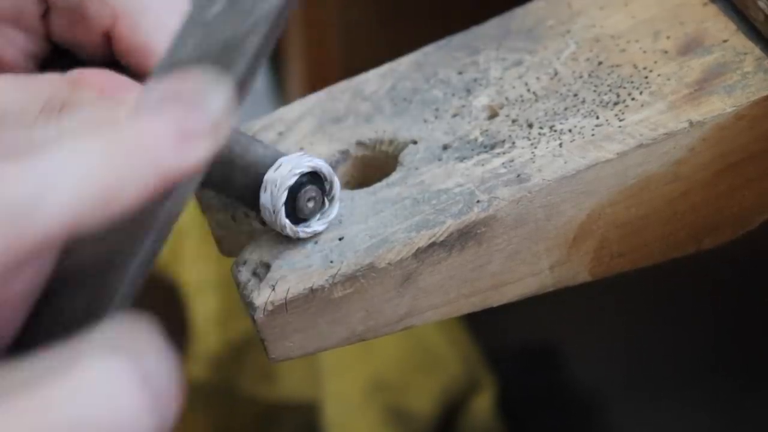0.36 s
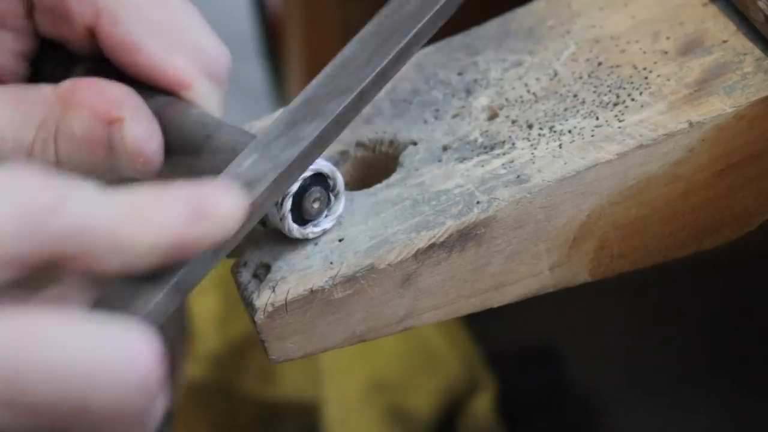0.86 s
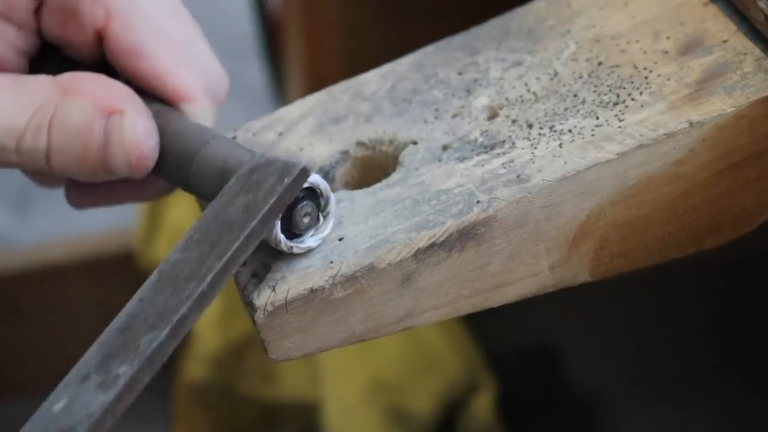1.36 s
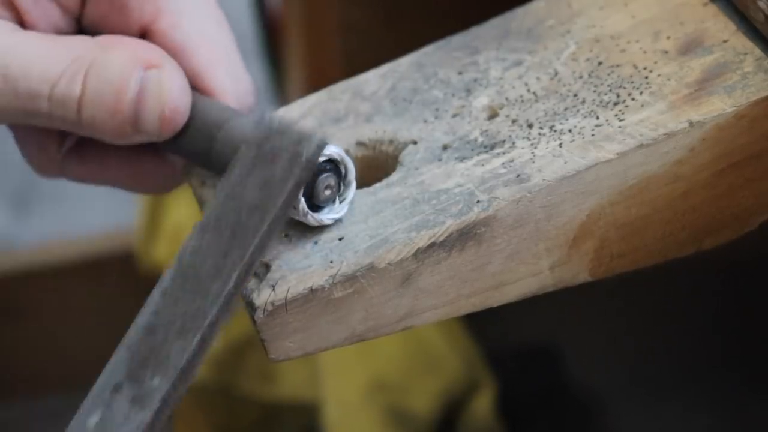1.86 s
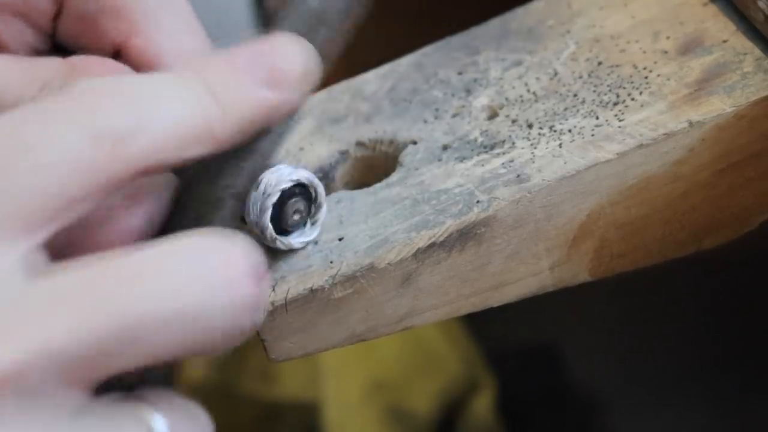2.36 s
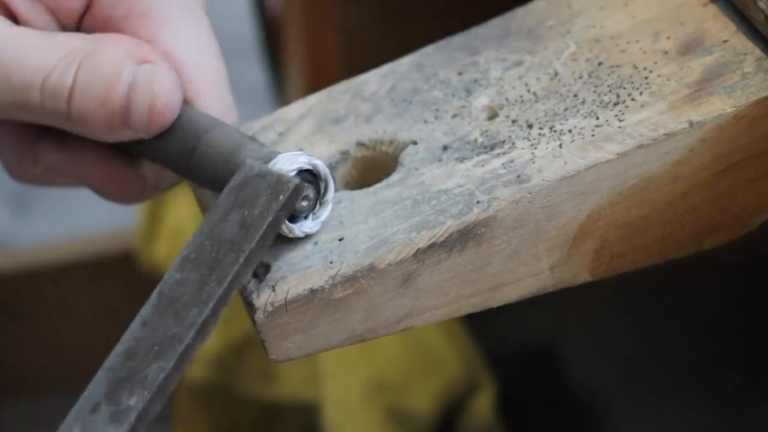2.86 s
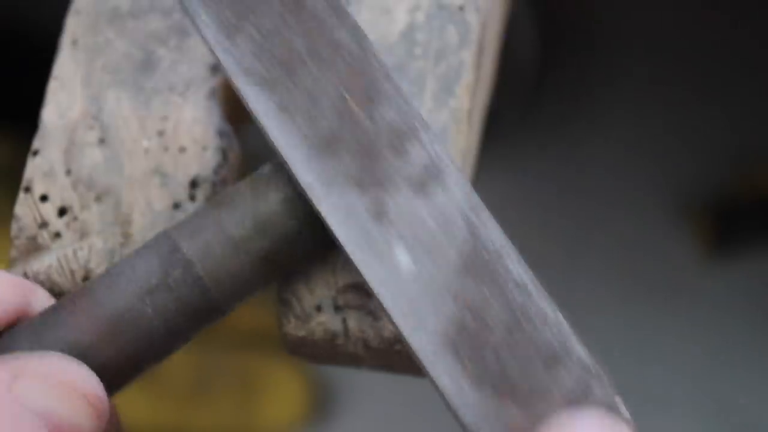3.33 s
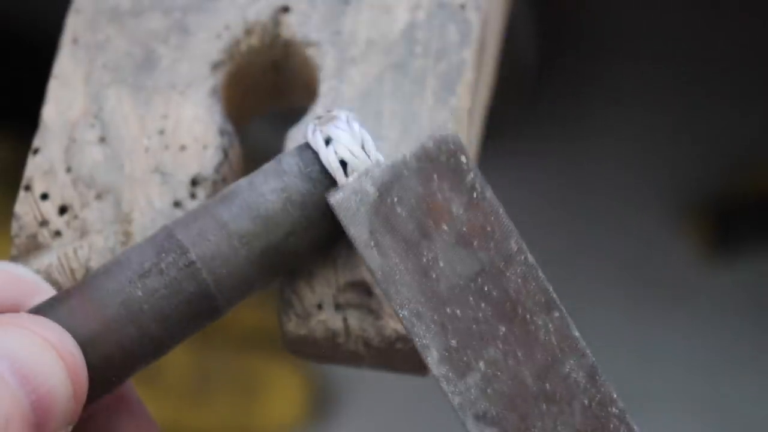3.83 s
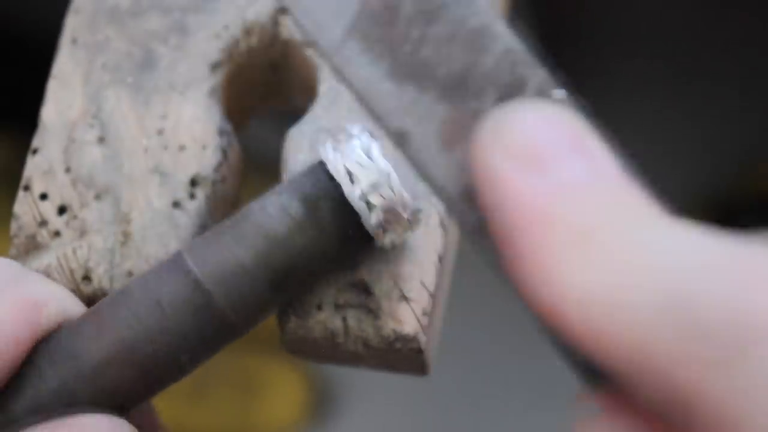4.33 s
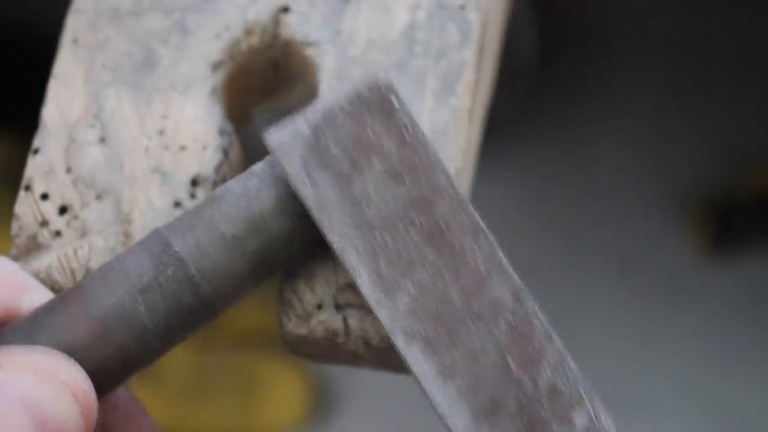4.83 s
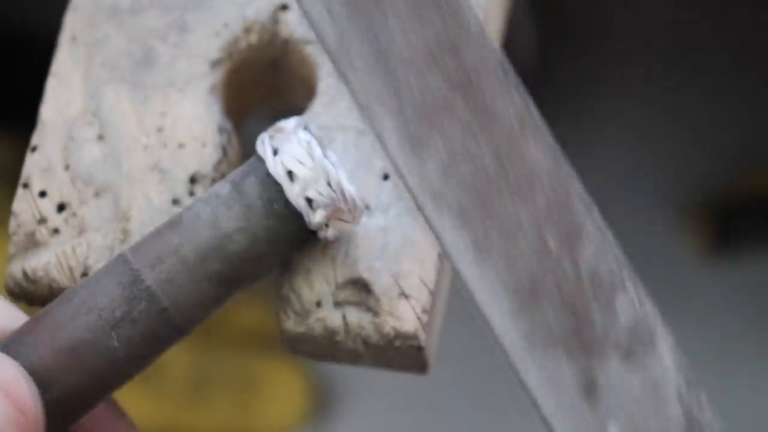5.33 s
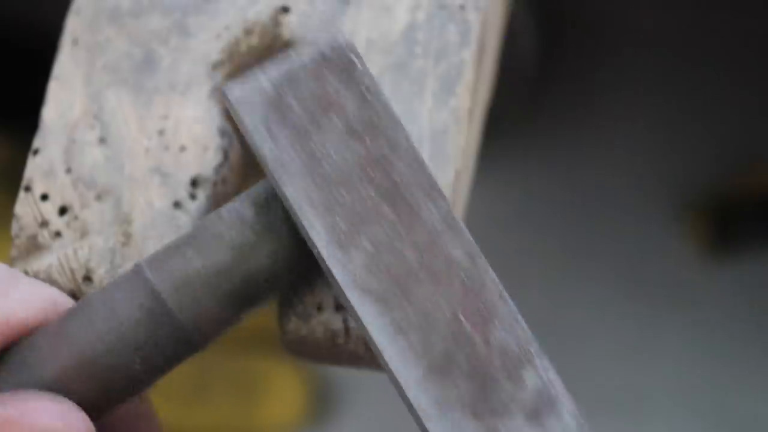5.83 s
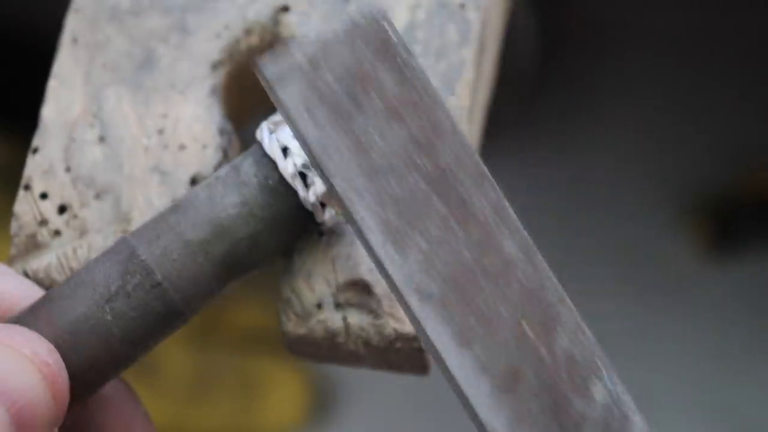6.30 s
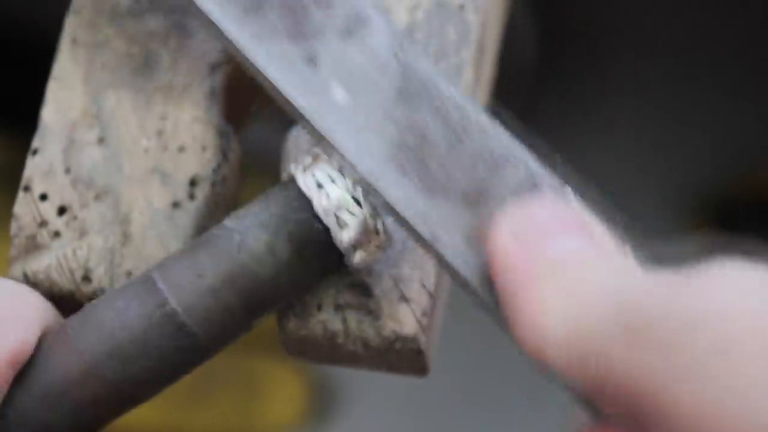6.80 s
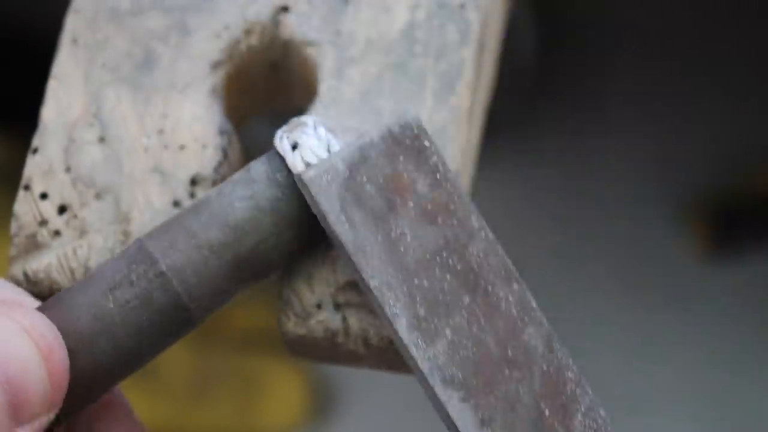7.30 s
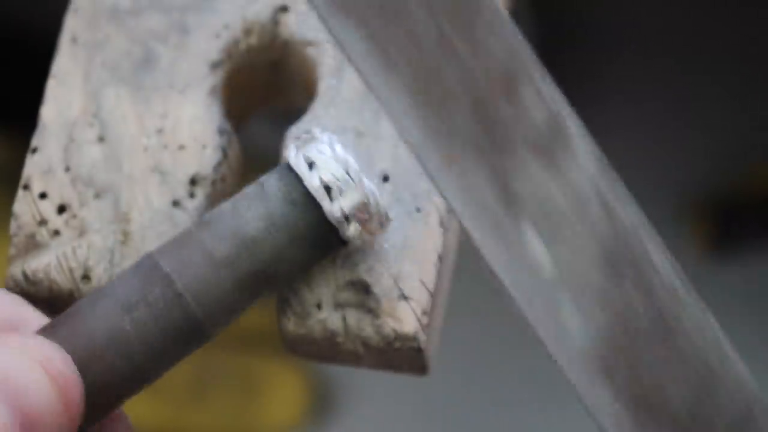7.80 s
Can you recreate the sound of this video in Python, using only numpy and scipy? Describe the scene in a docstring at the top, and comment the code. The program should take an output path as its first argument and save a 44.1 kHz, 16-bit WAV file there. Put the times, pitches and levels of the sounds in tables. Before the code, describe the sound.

Close stereo sound of a steel file working a metal ring held on a mandrel against a wooden bench, in a small, slightly live workshop with soft, steady air. Each stroke begins with a short hard knock, then a rough, gritty rasp with an uneven buzzing pitch lasting about 0.3 seconds, and leaves a brief metallic ring. Strokes start at about 0.0, 0.7, 1.4, 2.1 and 2.8 seconds, the fifth softer at first. At 3.1 the perspective cuts abruptly, and a stroke starts at once with several sharp catches and a bright skid near 3.4. More follow at about 3.9, 4.8, 5.8, 6.5 and 7.3, with wider gaps. A faint tick comes at 4.6, another gritty skid at 6.0, and barely audible light brushes around 4.6, 5.3 and 7.1. The last rasp ends near 7.7, leaving quiet air.

```python
"""In a small workshop a steel file lands on a metal ring on a mandrel and rasps across it on a wooden bench pin.
Unevenly spaced teeth and grit drive the rings of file, mandrel and bench; landings and catches are short knocks.
Bright skids cut into two strokes; small ticks and light brushes come between, over soft steady room air.
After the fifth stroke the sound is cut to a second, differently placed view, with a ring of its own."""
import sys
import numpy as np
from scipy import signal
from scipy.fft import rfft
from scipy.io import wavfile
from scipy.ndimage import uniform_filter1d

SR = 44100
rng = np.random.default_rng(int(sys.argv[2]) if len(sys.argv) > 2 else 0)


def waveform_to_disk(signal):
    """Save audio, clipped to [-1, 1], as 16-bit WAV at the path in sys.argv[1]."""
    frames = np.transpose(np.atleast_2d(signal))
    scaled = np.clip(frames, -1, 1) * 32767
    samples = np.round(scaled).astype(np.int16)
    wavfile.write(sys.argv[1], SR, samples)


def amplitude_ratio(level_db):
    """Convert a level in decibels to the matching linear amplitude (field) ratio."""
    exponent = np.asarray(level_db, float) / 20
    return 10 ** exponent


N = 349272
CUT_S = 3.107  # the second view starts here


def evened(x):
    """Scales a sound to an rms of one."""
    return x / np.sqrt(np.mean(x ** 2) + 1e-20)


def read(points, hz):
    """Reads a table of (frequency, value) along a logarithmic frequency axis."""
    f, value = np.transpose(points)
    return np.interp(np.log(hz + 1), np.log(f + 1), value)


def causal(gain_db):
    """Minimum-phase impulse response for a gain given from 0 Hz to half the sample rate."""
    mirrored_db = np.r_[gain_db, gain_db[-2:0:-1]]
    log_gain = np.log(amplitude_ratio(np.maximum(mirrored_db, -100)))
    spectrum = np.exp(np.conj(signal.hilbert(log_gain)))
    return np.fft.ifft(spectrum).real[:len(gain_db) - 1]


def pair(same, shape):
    """Two complex noise fields, left and right, alike by the share same."""
    a, b, c, d = rng.standard_normal((shape[1], shape[0], 4)).T
    same = np.clip(same, -1, 1)[:, None]
    left, other = a + 1j * b, c + 1j * d
    return np.array([left, same * left + np.sqrt(1 - same ** 2) * other])


def band(x, lo_hz, hi_hz):
    """One band of a sound, at an rms of one."""
    return evened(signal.sosfilt(signal.butter(2, [lo_hz, hi_hz], "bandpass", fs=SR, output="sos"), x))


def resonate(x, hz, width_hz):
    """Shifts the curve hz down to zero, smooths, and shifts back: a moving resonance, at an rms of one."""
    turn = np.exp(2j * np.pi * np.cumsum(hz * np.ones(len(x))) / SR)
    r = np.exp(-np.pi * width_hz / SR)
    return evened((turn * signal.lfilter([1 - r], [1, -r], x / turn)).real)


def add(mix, s, sound):
    """Lays a sound into the mix at s seconds."""
    part = mix[round(s * SR):][:len(sound)]
    part += sound[:len(part)]


def view_at(s):
    """Which view hears the time s: 0 before the cut, 1 after."""
    return int(s > CUT_S)


def stroke(rows, grip, ring):
    """Unevenly spaced teeth and loose grit knock the parts; the hand judders the pressure."""
    # change of the grip along every stroke:
    # (travel [0-1], bench thrum [dB], steel ring [dB], grit [dB], bright bite [dB])
    travel = [(0, 19.5, 2, -4.5, -12), (.2, 0.5, -14, -1.5, -7.5), (.45, 0, -5.5, -0.5, 2),
              (.75, 0, 0.5, 2.5, 2.5), (1, -21, 1, -8.5, -9.5)]
    jitter, uneven_db, judder_db = .25, 4.0, 2.6  # tooth spacing [share], tooth bites [dB], hand [dB]
    s, *columns = np.transpose(rows)
    t = np.arange(s[0], s[-1], 1 / SR)
    press_db, hz = (np.interp(t, s, c) for c in columns)
    along, *changes = np.transpose(travel)
    progress = np.linspace(0, 1, len(t))
    bench_db, steel_db, grit_db, bite_db = (
        db + np.interp(progress, along, c) for db, c in zip(grip, changes))
    octaves = np.log2(hz / 800)  # a faster file rings brighter
    wobble, judder, noise = rng.standard_normal((len(t), 3)).T

    tooth_hz = hz * np.maximum(1 + jitter * evened(uniform_filter1d(wobble, 40)), .1)
    teeth = np.cumsum(tooth_hz) / SR
    bite_size = amplitude_ratio(uneven_db * np.minimum(rng.exponential(1, len(t)), 2))
    bites = np.diff(np.floor(teeth), prepend=0) * bite_size
    push = bites - uniform_filter1d(bites, 200)
    hand = amplitude_ratio(judder_db * evened(uniform_filter1d(judder, 300)))
    drive = (evened(push) + .8 * noise) * hand  # teeth and grit
    rung = signal.fftconvolve(drive, ring)[:len(t)]

    # the tooth rate stands out as a rough tone
    whirr = band(rung, 310, 1790) + 1.1 * resonate(rung, hz, 230)
    sound = evened(whirr) + amplitude_ratio(bench_db) * band(rung, 56, 205)
    # slopes in dB per octave of tooth rate: steel 5, bite 7.5, grit 2.5
    sound += amplitude_ratio(steel_db + 5 * octaves) * band(rung, 1075, 2290)
    sound -= amplitude_ratio(bite_db + 7.5 * octaves) * band(rung, 2686, 5130)
    sound -= amplitude_ratio(grit_db + 2.5 * octaves) * band(rung, 5150, 18000)
    return s[0], amplitude_ratio(press_db) * sound * signal.windows.tukey(len(t), .08)


def knock(ring, db, tilt_db, mode_hz, contact_s, ring_s, thump_db=-40):
    """A short chattering contact rings the parts, damped by the hands; the bench adds a low thump."""
    t = np.arange(4000) / SR
    chatter = rng.standard_normal(len(t)) * np.exp(-(t / contact_s) ** 2)
    hz = np.fft.rfftfreq(1024, 1 / SR)
    favoured_db = 4 / (1 + ((hz - mode_hz) / 300) ** 2)
    light_db = -9 / (1 + (hz / 350) ** 4)  # a light tap barely moves the bench
    bright_db = tilt_db * np.log2((np.minimum(hz, 6500) + 200) / 1500)
    chatter = signal.fftconvolve(chatter, causal(bright_db + favoured_db + light_db))[:len(t)]
    hit = signal.fftconvolve(chatter, ring[:len(t)] * np.exp(-t / ring_s))[:len(t)]
    thump = np.sin(2 * np.pi * 142 * t) * (1 - np.exp(-t / 0.0015)) * np.exp(-t / 0.011)
    return amplitude_ratio(db) * (hit / abs(hit).max() + amplitude_ratio(thump_db) * thump)


def skid(db):
    """A short spray of grit, high and dry, as the file skids off a tooth."""
    t = np.arange(1500) / SR
    spray = band(rng.standard_normal(len(t)), 3600, 5630)
    return amplitude_ratio(db) * spray * np.minimum(t / 0.00078, 1) * np.exp(-t / 0.012)


def brush(start, length, squeak_db, rub_db):
    """A light touch swells and fades, sounding one high mode of the file and a low one of the mandrel."""
    noise = rng.standard_normal(round(length * SR))
    squeak = amplitude_ratio(squeak_db) * resonate(resonate(noise, 3355, 60), 3040, 200)
    rub = amplitude_ratio(rub_db) * resonate(resonate(noise, 474, 90), 400, 150)
    return start, (squeak + rub) * signal.windows.tukey(len(noise), .7)


def body(broad, modes):
    """The ring of the struck parts: peaks of the modes raised on the broad colour."""
    # treble of the struck parts: (frequency [Hz], relative level [dB])
    treble = [(2650, -29), (4500, -8.5), (5410, -8.5), (5880, -7), (6600, -2), (7850, -11.5),
              (10300, -22.5), (14300, -19), (15000, -17), (15800, -25)]
    hz = np.fft.rfftfreq(8192, 1 / SR)
    peaks = sum((amplitude_ratio(2 * db) - 1) / (1 + (2 * (hz - f) / width) ** 2) for f, width, db in modes)
    colour = np.hypot(amplitude_ratio(read(broad, hz)), amplitude_ratio(read(treble, hz) - 20))
    return causal(20 * np.log10(colour) + 10 * np.log10(np.maximum(1 + peaks, .01)))


def view_rings():
    """File, mandrel and bench pin ring together, coloured by where each view hears them from."""
    # modes of file, mandrel and bench pin from each view: (frequency [Hz], width [Hz], rise [dB])
    modes_first = [(141, 17, 10.5), (273, 100, 13.5), (464, 130, 6), (693, 10, 3), (880, 72, 3),
                   (1080, 38, 11), (1350, 51, 7.5), (1730, 58, 5.5), (1990, 150, 7), (2318, 29, 8.5),
                   (3280, 750, 3.5), (3464, 100, 5), (5100, 110, 13), (5700, 85, 6.5)]
    modes_second = [(149, 32, 10), (259, 35, 19), (401, 92, 4.45), (561, 48, 8.4), (706, 19, 9.4),
                    (850, 8, 9), (985, 55, 7.5), (1070, 194, 9.1), (1680, 110, 5.1), (1750, 78, 1.7),
                    (2020, 21, 8.7), (2280, 22, 8.7), (3270, 28, 4.3), (3320, 390, 6), (5590, 190, 7.5)]
    # broad colour of the struck parts from each view: (frequency [Hz], relative level [dB])
    broad_first = [(35, -46), (60, -25), (140, -7), (316, -7.5), (524, -1.5), (1670, -7), (2030, -6),
                   (2430, -15), (3190, -8), (4500, -19.5), (5850, -44), (9900, -120)]
    broad_second = [(35, -65), (60, -14), (90, -12.5), (135, 2.5), (187, -6.5), (407, 4.5), (739, -5.5),
                    (1060, -4.5), (1250, -5.5), (1580, 1.5), (4500, -19.5), (5850, -33), (9900, -120)]
    return [body(broad_first, modes_first), body(broad_second, modes_second)]


def ring_on(views):
    """The free ring of the file and a low ring of the bench pin, decaying sines excited by every contact, last
    after the file is lifted."""
    # free ring of the file, and at 261 Hz of the bench pin: (frequency [Hz], relative level [dB], t60 [s])
    file_ring = [(261, -9.5, 0.3), (850, -3, 0.38), (1098, -4.5, 0.54), (1600, -7.5, 0.08),
                 (2000, -6, 0.19), (2220, -8, 0.39), (3536, -29, 0.4)]
    t = np.arange(SR // 2) / SR
    free = 0
    for hz, db, t60 in file_ring:
        decay = amplitude_ratio(db - 60 * t / t60)
        free = free + decay * np.sin(2 * np.pi * hz * t) * 2 * np.log(1000) / t60 / SR
    return views + amplitude_ratio(3) * signal.fftconvolve(views, free[None], axes=1)[:, :N]


def filing():
    """All strokes, landings, catches, ticks, skids and brushes, dry: one row for each view."""
    # one table a stroke, from resting on the ring through the push to lifting off:
    # (time [s], pressure [dB], teeth passing [Hz])
    stroke_rows = [
        [(0.02, -32.5, 650), (0.095, -26.5, 750), (0.124, -18.5, 880), (0.176, -19, 720), (0.27, -20.5, 710),
         (0.31, -40, 700)],
        [(0.72, -32, 760), (0.772, -25.5, 600), (0.798, -16, 610), (0.86, -20, 740), (0.94, -22.5, 850),
         (0.99, -32.5, 975), (1.04, -37.5, 1035)],
        [(1.38, -21.5, 620), (1.432, -26, 555), (1.448, -18, 580), (1.53, -19.5, 540), (1.575, -16, 850),
         (1.615, -26.5, 1020), (1.65, -50, 1090)],
        [(2.11, -33, 690), (2.184, -28, 650), (2.25, -17.5, 1010), (2.298, -22, 1080), (2.354, -28.5, 850),
         (2.42, -32, 950), (2.47, -33.5, 950)],
        [(2.84, -38.5, 900), (2.906, -40, 730), (2.944, -27.5, 690), (2.986, -28, 540), (3.046, -22, 1010),
         (3.1, -19, 610)],
        [(3.16, -40, 650), (3.21, -31.5, 870), (3.254, -28, 1057), (3.264, -26, 1060), (3.318, -18, 990),
         (3.36, -22.5, 890), (3.46, -24, 850), (3.53, -54, 690)],
        [(3.96, -34, 680), (4.01, -40, 710), (4.068, -26, 870), (4.126, -22.5, 660), (4.178, -19, 900),
         (4.27, -20, 530), (4.33, -40, 540)],
        [(4.82, -22, 810), (4.85, -32, 800), (4.886, -25.5, 1040), (4.96, -18, 1000), (5.03, -20.5, 636),
         (5.094, -26, 559.5), (5.15, -44, 519)],
        [(5.78, -36, 900), (5.85, -20, 1030), (5.875, -23, 1040), (5.94, -16.5, 1030), (5.97, -24.5, 1020),
         (6.04, -18.5, 810), (6.11, -42, 700)],
        [(6.56, -28.5, 810), (6.636, -29, 1000), (6.654, -18.5, 1020), (6.71, -16.5, 985),
         (6.784, -14.5, 590.7), (6.82, -19, 476), (6.856, -17.5, 450.8), (6.92, -38, 470)],
        [(7.34, -29.5, 640), (7.41, -29, 920), (7.484, -19.5, 920), (7.52, -20, 1000), (7.64, -19, 700),
         (7.68, -69, 630)],
    ]
    # what each stroke shakes most, relative to its whirr:
    # (bench thrum [dB], steel ring [dB], grit [dB], bright bite [dB])
    grips = [(-17, -6.5, -10, -15.5), (-16.5, -5, -9.5, -15.5), (-19, -14, -9, -10.5), (-16, 0, -9, -12),
             (-11.5, -6.5, -11, -9.5), (-9.5, -10, -8.5, -8.5), (-9, -9.5, -10.5, -15.5),
             (-12, -7.5, -10.5, -19), (-12, -8, -11.5, -18), (-14.5, -7.5, -13.5, -30),
             (-12, -5.5, -9.5, -17.5)]
    # the file set down on the ring: (time [s], level [dB], brightness [dB/octave], mode struck hardest [Hz])
    landings = [(0.003, -3, 1, 768), (0.702, -3, 1.2, 648), (1.36, -0.3, 0, 660), (2.091, -4, 0.8, 1990),
                (2.825, -8, 4, 1420), (3.143, -2.5, 3, 1690), (3.944, -5.5, 2.2, 696),
                (4.798, -0.5, 5.5, 683), (5.761, -6.5, 1, 1560), (6.543, -2.5, 3.5, 1760),
                (7.323, 0.2, 4.5, 930)]
    # a tooth catching on the ring: (time [s], level [dB], brightness [dB/octave], mode struck hardest [Hz])
    catches = [(0.112, -11, -0.5, 463), (0.133, -6.5, 4.5, 1990), (0.796, -7, 0, 519), (0.861, -11, 0, 861),
               (1.444, -4.5, -6.5, 676), (2.257, -14, -1, 1990), (2.332, -7, -1, 1990),
               (3.045, -8, -1.8, 1310), (3.263, -13, 1.5, 1130), (3.29, -11, 3, 1120),
               (3.322, -6, -1.5, 1040), (3.404, -4, 3.5, 966), (3.44, -3, 6.5, 1900), (4.219, -8, -4, 791),
               (4.902, -16, -3, 1070), (4.934, -4, 2.3, 1080), (4.96, -12, 5.5, 2020),
               (5.085, -8.5, 0, 1600), (5.105, -14, -5.5, 480), (5.872, -8.5, -3, 1010),
               (5.939, -2.5, 1.5, 1050), (6.027, -15, 1, 1750), (6.05, -16, -5.5, 259),
               (6.645, -16, 8.5, 966), (6.839, -15, -4, 405), (7.431, -6.5, -0.5, 931),
               (7.536, -11, 6, 950)]
    # faint ticks of the lifted file: (time [s], level [dB])
    ticks = [(2.578, -41), (3.791, -41), (4.631, -33)]
    # the file skidding off a tooth with a bright scratch: (time [s], level [dB])
    skids = [(3.439, -19), (6.025, -20)]
    # the file brushing lightly on its way back: (start [s], length [s], thin squeak [dB], low rub [dB])
    brushes = [(4.61, .07, -64, -80), (5.27, .1, -60, -61), (5.37, .09, -59, -54), (7.04, .09, -62, -58),
               (7.13, .07, -57, -58)]
    rings, views = view_rings(), np.zeros((2, N))
    for rows, grip in zip(stroke_rows, grips):
        view = view_at(rows[0][0])
        add(views[view], *stroke(rows, grip, rings[view]))
    for s, db, tilt_db, hz in landings:
        view = view_at(s)
        add(views[view], s, knock(rings[view], db, tilt_db, hz, 0.0038, 0.0088, thump_db=-20.5))
    bright_ticks = [(s, db, 10, 1740) for s, db in ticks]
    for s, db, tilt_db, hz in list(catches) + bright_ticks:
        view = view_at(s)
        add(views[view], s, knock(rings[view], db, tilt_db, hz, 0.0051, 0.0076))
    for s, db in skids:
        add(views[1], s, skid(db))
    views = ring_on(views)
    for row in brushes:
        add(views[1], *brush(*row))
    return views


def path():
    """Direct sound leaning to one side, quick scatter off the bench and hands, then a tail dying band by band."""
    # reverberation time: (frequency [Hz], t60 [s])
    room_t60 = [(120, 0.77), (330, 0.31), (870, 0.43), (2300, 0.47), (6000, 0.48), (12000, 0.31)]
    # left-right likeness of the tail: (frequency [Hz], likeness [-1 to 1])
    room_same = [(100, 0.71), (300, 0.99), (700, 0.74), (2000, 0.064), (8000, -0.11)]
    # tail before the overall colour is evened: (frequency [Hz], relative level [dB])
    room_db = [(100, -16.5), (500, 4), (2000, -1.5), (6000, -6), (14000, 0.5)]
    # lean of the whole path: (frequency [Hz], left over right [dB])
    lean_db = [(200, 2.5), (500, -1), (1500, -1.5), (4000, -2), (9000, 0)]
    hz, t = np.fft.rfftfreq(256, 1 / SR), np.arange(480) * 64 / SR
    late = amplitude_ratio(read(room_db, hz)[:, None] - 60 * t / read(room_t60, hz)[:, None])
    scatter = amplitude_ratio(12 - 60 * t / 0.024)  # bench and hands: t60 of 24 ms
    fall = np.hypot(late, scatter)
    heard = signal.istft(pair(read(room_same, hz), fall.shape) * fall, nperseg=256, noverlap=192)[1]
    heard = heard / np.linalg.norm(heard[0])
    heard[[0, 1], [0, 1]] = 0.42  # the direct sound reaches the right side one sample later

    power = uniform_filter1d(abs(rfft(heard, 32768)) ** 2, 256, axis=1)[:, ::64]
    power_db = 10 * np.log10(power)
    fine = np.fft.rfftfreq(512, 1 / SR)
    power_db[:, fine < 400] = power_db.mean(0)[fine < 400]  # the bass shares one correction on both sides
    # even broad colour, plus the lean
    lean = [causal(side * read(lean_db, fine) / 2 - p) for side, p in zip((1, -1), power_db)]
    return signal.fftconvolve(heard, lean, axes=1)


def workshop(x):
    """Blends three random scatter paths in steady rotation, so no single one colours the sound."""
    paths, turn_s = 3, .16  # one round of all paths takes turn_s
    phase = 2 * np.pi * len(x) / SR / turn_s * np.linspace(0, 1, len(x))
    heard = 0
    for k in range(paths):
        share = np.sqrt((1 + np.cos(phase + 2 * np.pi * k / paths)) / paths)
        heard = heard + signal.oaconvolve((x * share)[None], path(), axes=1)[:, :len(x)]
    return heard


def room_tone():
    """Soft steady air of the workshop: coloured noise, slightly uneven in level."""
    # colour of the air: (frequency [Hz], relative level [dB])
    air = [(38, -24), (58, 12.5), (85, -20), (125, 4), (170, -8.5), (220, 4), (290, -5), (380, -7),
           (800, -8), (1100, -8), (1700, -14.5), (4000, -20), (10000, -28.5), (15900, -32)]
    # left-right likeness of the air: (frequency [Hz], likeness [-1 to 1])
    air_same = [(60, 0.54), (240, 0.84), (950, 0.27), (3770, -0.064), (15000, -0.0039)]
    hz, frames = np.fft.rfftfreq(2048, 1 / SR), N // 512 + 5
    noise = rng.standard_normal((frames, len(hz))).T
    uneven = evened(uniform_filter1d(uniform_filter1d(noise, 20, 0), 10, 1))
    z = pair(read(air_same, hz), uneven.shape) * amplitude_ratio(read(air, hz)[:, None] + .6 * uneven)
    return amplitude_ratio(-51.5) * evened(signal.istft(z, nperseg=2048, noverlap=1536)[1][:, :N])


def scene():
    """The first view fades out quickly at the cut, echo and all; the second carries on over the same air."""
    first, second = filing()
    cut = round(CUT_S * SR)
    fade = np.clip((CUT_S - np.arange(cut) / SR) / .011, 0, 1)  # 11 ms
    return np.hstack([workshop(first[:cut]) * fade, workshop(second[cut:])]) + room_tone()


def roll_off(x):
    """The treble ends steeply here."""
    return signal.sosfilt(signal.butter(12, 16080, fs=SR, output="sos"), x)


def record(dry):
    """Two close microphone capsules hear the bass alike and drop the lowest of it."""
    mid, side = dry.mean(0), (dry[0] - dry[1]) / 2
    side = signal.sosfilt(signal.butter(1, 260, "highpass", fs=SR, output="sos"), side)
    low_cut = signal.butter(2, 45, "highpass", fs=SR, output="sos")
    pickup = signal.sosfilt(low_cut, [mid + side, mid - side])
    return roll_off(pickup)


dry = scene()
out = record(dry)
waveform_to_disk(out)
```